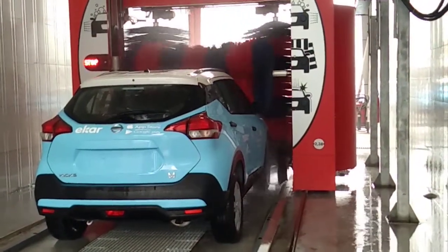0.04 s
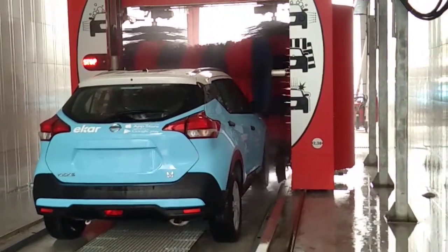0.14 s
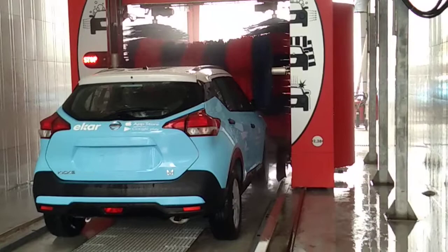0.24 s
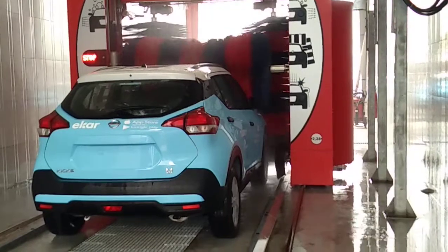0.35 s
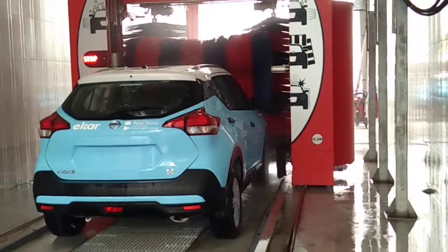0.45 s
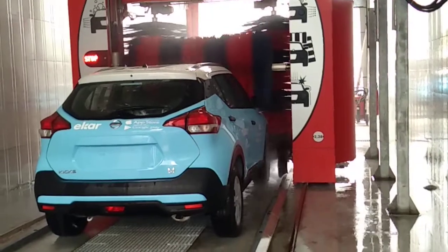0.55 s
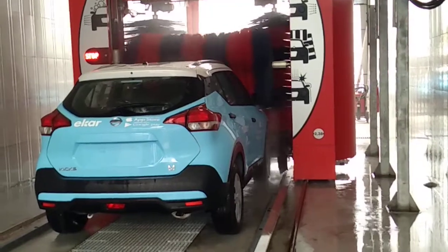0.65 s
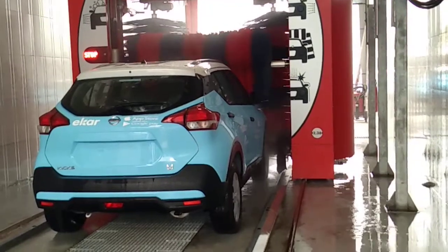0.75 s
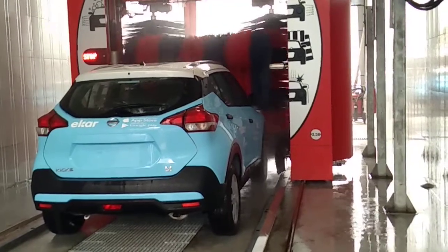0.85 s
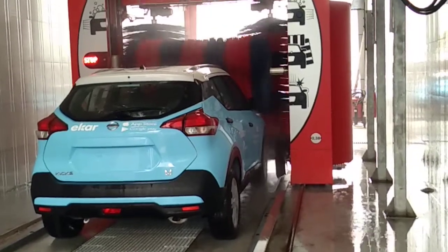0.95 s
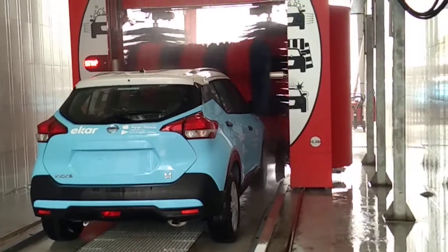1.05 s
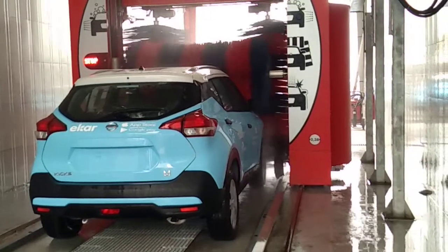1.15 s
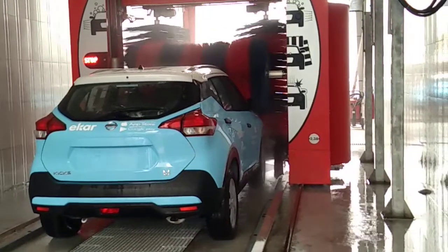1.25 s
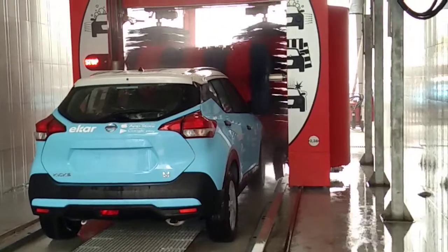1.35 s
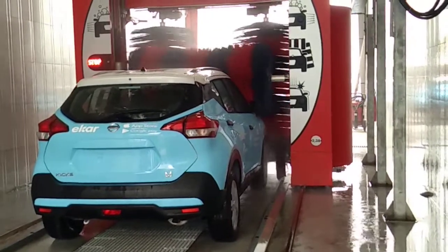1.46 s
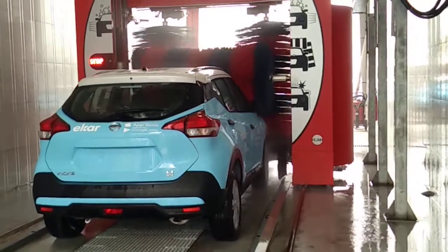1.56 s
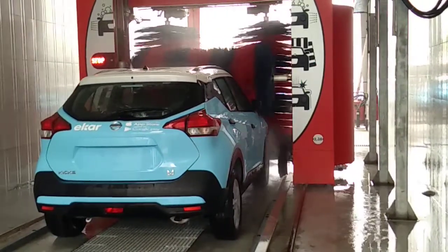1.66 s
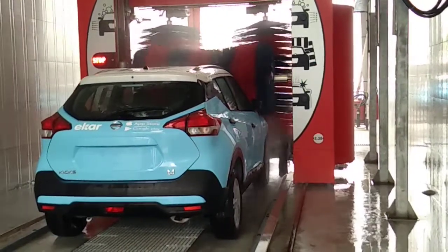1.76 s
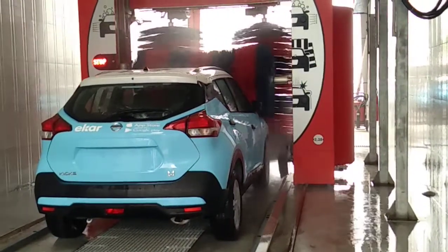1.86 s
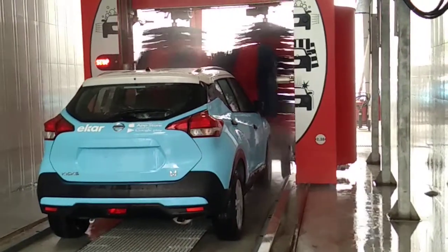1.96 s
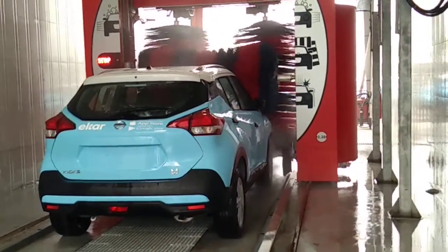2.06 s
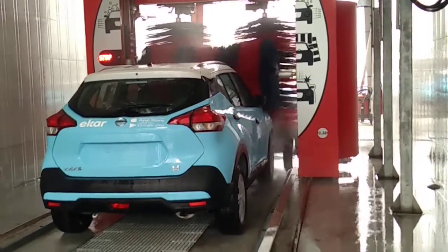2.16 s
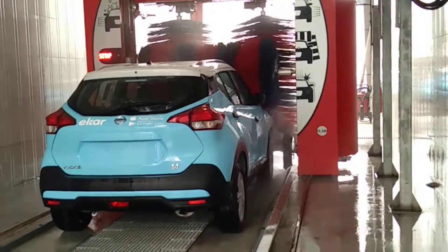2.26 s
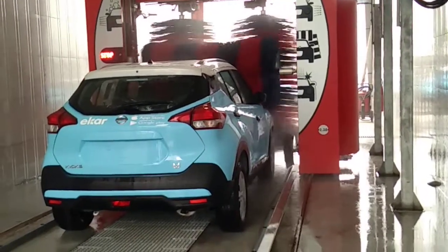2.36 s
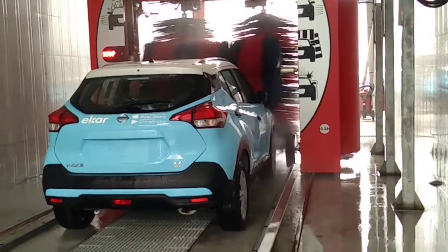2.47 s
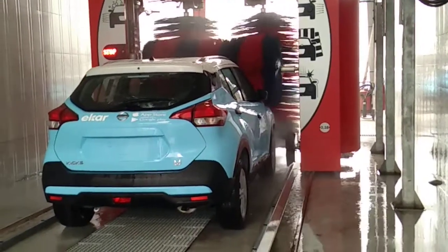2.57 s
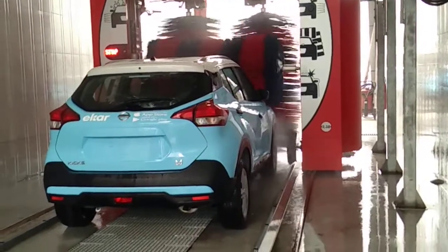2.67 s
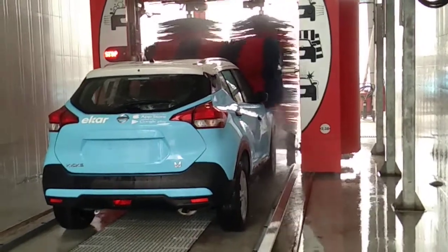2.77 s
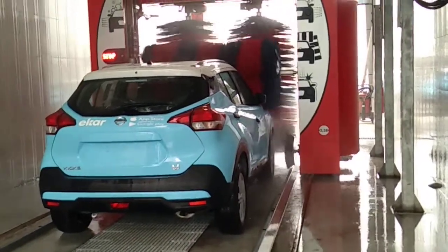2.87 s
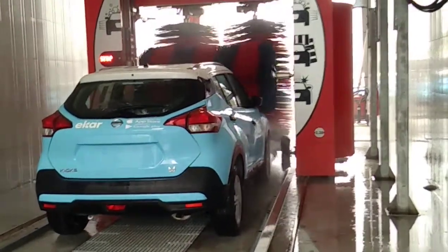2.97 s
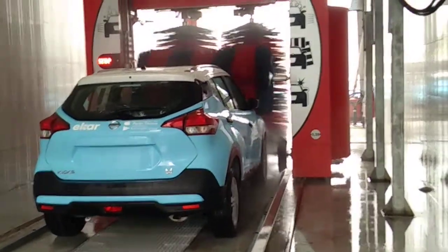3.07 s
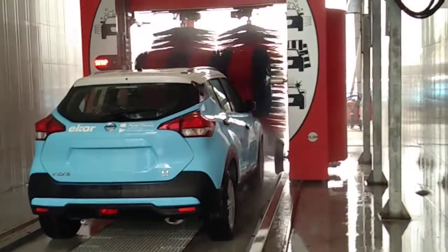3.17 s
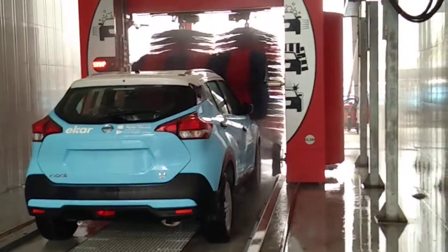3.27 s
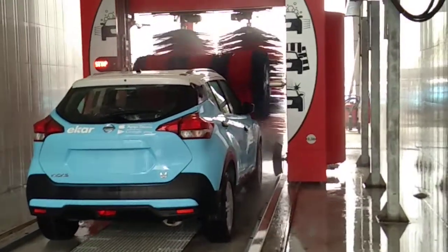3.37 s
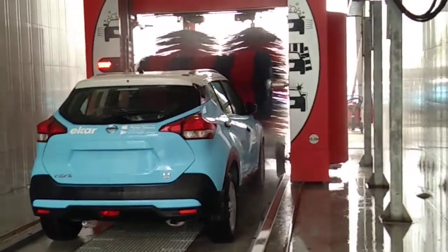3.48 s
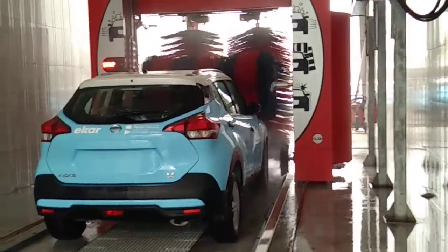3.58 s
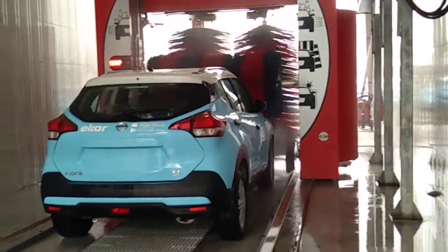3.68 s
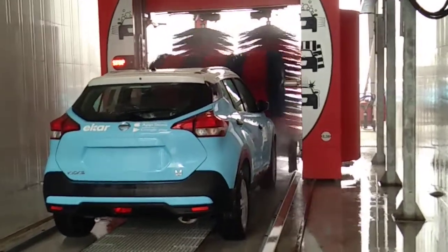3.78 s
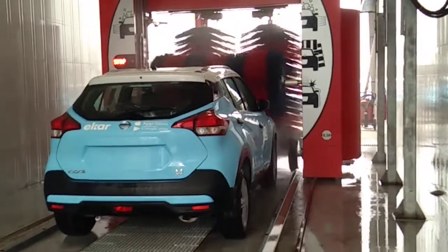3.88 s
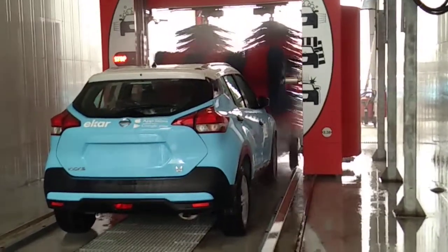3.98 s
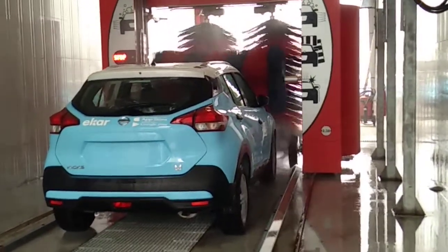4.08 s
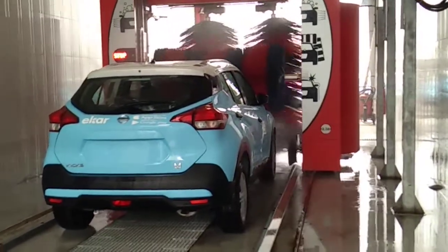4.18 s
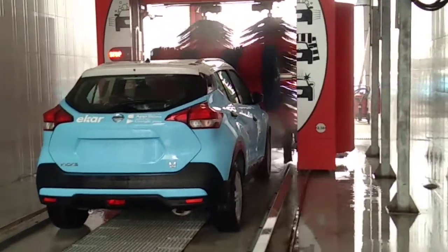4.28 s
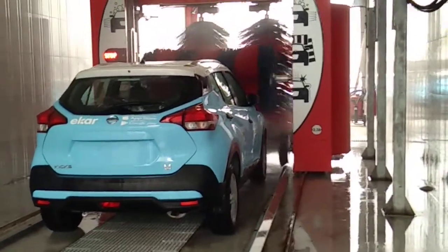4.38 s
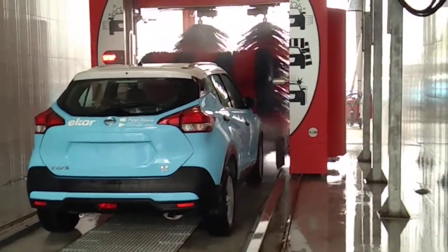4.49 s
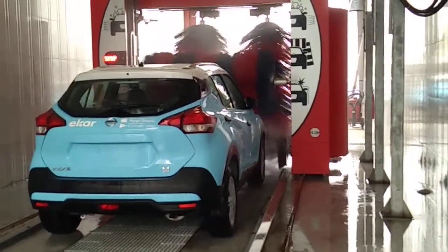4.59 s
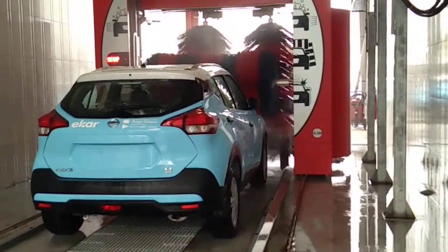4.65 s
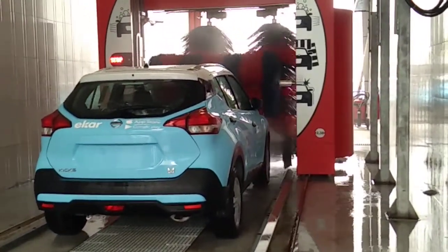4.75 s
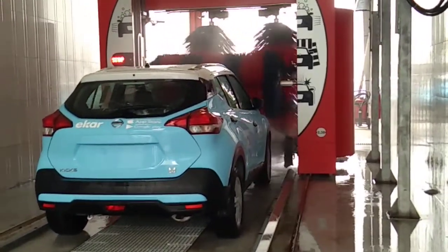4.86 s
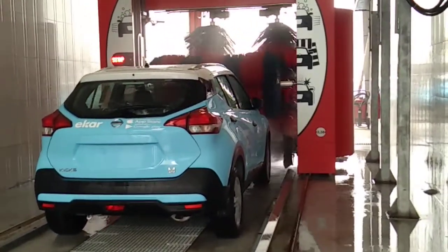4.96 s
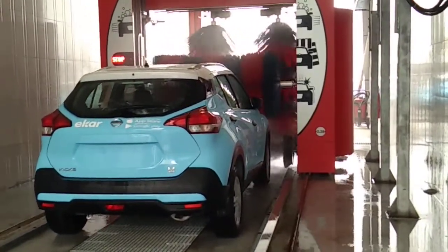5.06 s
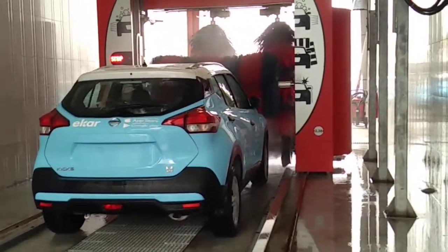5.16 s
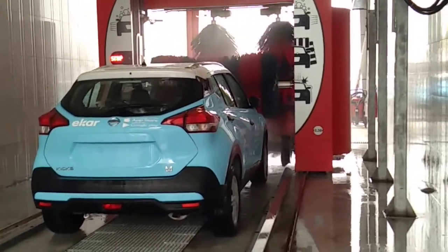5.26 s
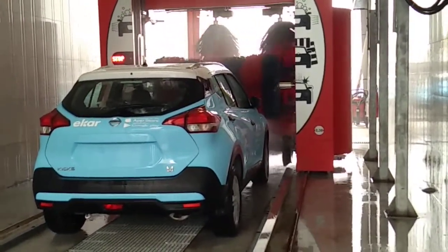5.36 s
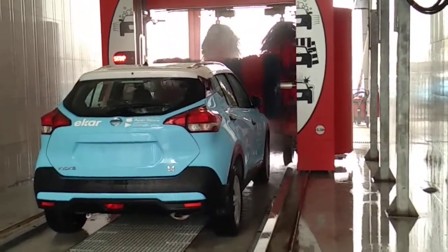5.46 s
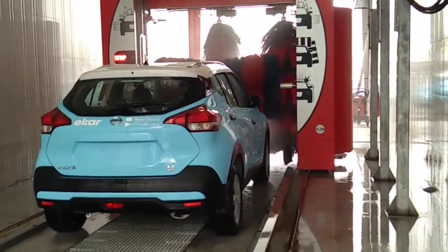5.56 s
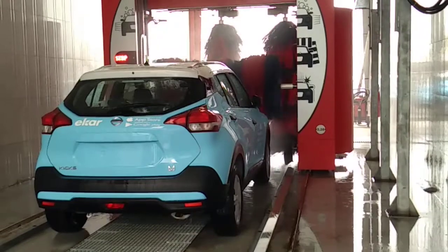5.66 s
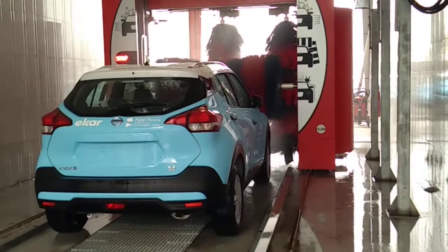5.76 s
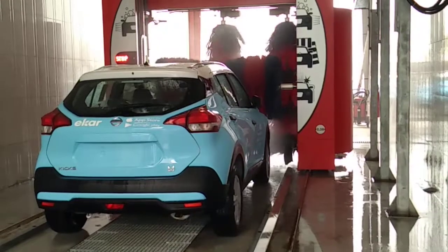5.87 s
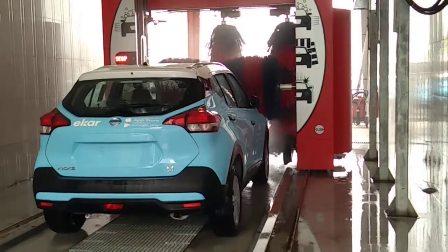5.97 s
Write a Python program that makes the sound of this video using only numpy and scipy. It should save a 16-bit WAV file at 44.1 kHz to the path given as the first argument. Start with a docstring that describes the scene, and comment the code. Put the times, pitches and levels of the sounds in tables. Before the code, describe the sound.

In a hard-walled car wash bay, dense water spray and a hollow rush of wet brush strips run together from the start. Low rumble swells come and go, with two soft body thuds about a second in. The wash slowly weakens, then drops quickly near the end, leaving faint thin wavering tones and hiss. The microphone's noise reduction makes the fading rush patchy, with muffled treble.

```python
"""Water jets of a gantry car wash spray in a tiled bay and fade as the wash winds down: shaped noise.
Wet brush strips scrub the body, a hollow noise rush in lumps; low rumble swells are filtered noise.
Thuds and short soft tones are decaying sines; late thin tones are wavering sines in noise halos.
The recorder's noise suppressor ducks bands near or below a threshold, so hollows open in the rush.
A fine treble haze and steady microphone hiss lie under it all, and the very top is cut off."""
import sys
import numpy as np
from scipy import signal
from scipy.fft import rfft, irfft, next_fast_len
from scipy.io import wavfile

SR = 44100
rng = np.random.default_rng(int(sys.argv[2]) if len(sys.argv) > 2 else 0)


def pcm_store(signal):
    """Save signal as 16-bit PCM."""
    levels = np.round(np.clip(np.atleast_2d(signal), -1, 1) * 32767)
    wavfile.write(sys.argv[1], SR, levels.astype(np.int16).T)


N = 265746   # length in samples, about 6 s


def from_db(db):
    """Turn decibels into a gain."""
    return 10 ** (np.asarray(db) / 20)


def rms_one(x):
    """Scale a sound to an average strength (rms) of 1."""
    return x / np.sqrt(np.mean(x ** 2) + 1e-20)


def in_time(rows):
    """Join the points of a time table by straight lines, one curve per column."""
    time_s, *columns = np.transpose(rows)
    return [np.interp(np.arange(N) / SR, time_s, column) for column in columns]


def at_hz(points, hz):
    """Read a spectrum table at any pitch, along a logarithmic pitch axis."""
    point_hz, point_db = np.transpose(points)
    return np.interp(np.log(hz + 1), np.log(point_hz), point_db)


def drift(rate):
    """Slow random wander with rms 1: noise smoothed twice; a higher rate wanders faster."""
    step = 40   # samples between the computed points
    memory = np.exp(-2 * np.pi * step * rate / SR)
    noise = rng.standard_normal(N // step + 2002)
    slow = signal.lfilter([1], [1, -2 * memory, memory ** 2], noise)[2000:]   # drop the settling
    return np.interp(np.arange(N) / step, np.arange(len(slow)), rms_one(slow))


def coloured(spectrum, closed=True):
    """Noise shaped to a spectrum, rms 1; closed ends fall away beyond the table."""
    size = next_fast_len(N)
    hz = np.fft.rfftfreq(size, 1 / SR)
    if closed:
        spectrum = [(10, -90)] + spectrum + [(4 * spectrum[-1][0], -110)]
    white = rfft(rng.standard_normal(size))
    return rms_one(irfft(white * from_db(at_hz(spectrum, hz)), size)[:N])


def low_parts(x, edges_hz, order):
    """Copies of a sound, each keeping what lies below one edge, without delay."""
    return [signal.sosfiltfilt(signal.butter(order, hz, fs=SR, output="sos"), x) for hz in edges_hz]


def resonance(x, hz, width_hz):
    """Something that rings at one pitch: a band-pass filter with gain 1 at its peak."""
    r = np.exp(-np.pi * width_hz / SR)
    feedback = [1, -2 * r * np.cos(2 * np.pi * hz / SR), r * r]
    return signal.lfilter([(1 - r * r) / 2, 0, (r * r - 1) / 2], feedback, x)


def narrow(modes, flicker_db, rate):
    """Noise sent twice through each resonance, wavering in level."""
    total = 0
    for hz, width_hz, level_db in modes:
        once = resonance(rng.standard_normal(N), hz, width_hz)
        tone = rms_one(resonance(once, hz, width_hz))
        total = total + from_db(level_db + flicker_db * drift(rate)) * tone
    return total


# Water flow through the nozzles, as spray level: time_s, level_db
WATER_FLOW = [(0, -18.5), (.1, -18.5), (.48, -19), (.62, -17.5), (1.0, -19.5), (1.4, -20), (2.25, -21),
              (2.5, -22), (3.4, -22.5), (4.2, -23), (5.1, -23.5), (5.3, -25.5), (5.4, -28), (5.5, -29.5),
              (5.6, -30), (5.64, -33), (5.7, -35), (5.76, -37.5), (6.03, -38.5)]


def water_flow():
    """The flow sets the spray level and also steers the brushes and the haze."""
    return in_time(WATER_FLOW)[0]


# Tone colour of the jets: pitch_hz, relative level_db (per Hz)
SPRAY_SPECTRUM = [(900, -18), (1200, -5.5), (1460, -2.5), (2400, -0.5), (3100, -4), (4080, -0.5),
                  (4280, -0.5), (4480, -14.5), (4580, -20), (5400, -37)]
# How much faster or slower each band fades, low to high: loss_db per dB of missing flow
BAND_LOSSES = (.3, 0.16, .2, 0.025, -0.079, 0.13, .1, .3)
# Narrow high noise bands: pitch_hz, width_hz, level_db (rms, before level change and flicker)
HIGH_BANDS = [(4625, 100, -51), (4850, 60, -62), (5067, 120, -56), (5521, 80, -58)]
# Level of the high bands over time: time_s, change_db
HIGH_BAND_CHANGE = [(0, 4), (.4, 5), (.75, 4), (1.25, -1), (1.45, -1.5), (1.7, 1), (2.0, -3), (2.45, -7),
                    (2.65, -6), (2.85, -11), (3.4, -24), (6.03, -20)]
# Below this flow the jets flicker, by this share of the missing dB
SPUTTER_BELOW_DB, SPUTTER_SHARE = -27, 0.22


def spray(level_db):
    """Dense jets on metal blur into smooth noise; its bands surge separately, narrow high ones flicker."""
    jets = coloured(SPRAY_SPECTRUM)
    lows = low_parts(jets, (1290, 1680, 2020, 2300, 3080, 3470, 4000), order=4)
    bands = np.diff([0 * jets] + lows + [jets], axis=0)
    missing_db = np.maximum(SPUTTER_BELOW_DB - level_db, 0)
    sputter_db = SPUTTER_SHARE * missing_db
    surging = 0
    for band, loss in zip(bands, BAND_LOSSES):
        band_db = 0.13 * drift(7.5) + sputter_db * drift(12.0) - loss * missing_db
        surging = surging + band * from_db(band_db)
    surging = surging * from_db(0.061 * drift(3.0))   # all bands together
    high_bands = narrow(HIGH_BANDS, flicker_db=3.5, rate=7.3)
    return from_db(level_db) * surging + from_db(in_time(HIGH_BAND_CHANGE)[0]) * high_bands


# Level at 0 dB flow, share of the flow's swing, and loss as the brushes slow
SCRUB_DB, SCRUB_FOLLOWS, BRUSH_SAG_DB_PER_S = -6.5, 0.66, 1.5
BRUSH_LIFT_S, BRUSH_LIFT_DB = 5.38, -3   # the brushes leave the body within a tenth of a second


def brush_level(flow_db):
    """Brushes follow the water in part, lose level as they slow, then lift off the body."""
    t = np.arange(N) / SR
    lift_db = BRUSH_LIFT_DB * np.clip(10 * (t - BRUSH_LIFT_S), 0, 1)
    return SCRUB_DB + SCRUB_FOLLOWS * flow_db - BRUSH_SAG_DB_PER_S * t + lift_db


# Tone colour of the brush rush: pitch_hz, relative level_db (per Hz)
SCRUB_SPECTRUM = [(250, -61), (330, -6.5), (480, -6), (620, -4), (740, -2), (950, -5), (1100, -8),
                  (1400, -11.5)]
# Lower scrub against the rest: time_s, change_db below about 493 Hz, change_db at about 493-663 Hz
LOW_SCRUB = [(0, -3, 1), (.1, -3.5, -8.5), (.25, -4, 2), (.6, -1.5, -2.5), (1.1, 2, 2), (1.33, -3, 0.5),
             (1.5, 6, 2), (1.75, -6, 0), (1.95, 4.5, 1), (2.13, -12, 5.5), (2.25, 8.5, -0.5),
             (2.42, -1.5, 2.5), (2.5, -4, -7.5), (2.58, 1.5, 0), (2.68, -7, 1.5), (2.8, 5, -6),
             (2.88, 1, 1), (2.96, -4, 2), (3.08, 4.5, 1), (3.14, 0.5, -5), (3.2, -0.5, 0), (3.27, -3, -0.5),
             (3.38, 2.5, 2), (3.5, 0.5, -2.5), (3.56, 0, -9), (3.64, 3, -1), (3.75, -11, -12),
             (4.0, -3, -4), (4.3, 1, -6), (4.45, -11, -11), (5.12, -12, -8), (5.2, -13, 6), (5.27, -2, 0),
             (5.5, 2, -2), (6.03, 1, 1)]
LUMP_DB, LUMPS_PER_S = 2.6, 18   # random lumps: rms size, wander rate


def scrub(level_db):
    """Thousands of wet strips slap the panels and blur to a hollow rush with lumpy lower bands."""
    rush = coloured(SCRUB_SPECTRUM)
    lows = low_parts(rush, (363, 493, 543, 663), order=8)
    bands = np.diff([0 * rush] + lows, axis=0)
    low_db, high_db = in_time(LOW_SCRUB)
    lumpy = 0
    for band, band_db in zip(bands, (low_db, low_db, high_db, high_db)):
        lumpy = lumpy + band * from_db(band_db + LUMP_DB * drift(LUMPS_PER_S))
    upper = rush - lows[-1]
    return from_db(level_db + 0.54 * drift(11.0)) * (upper + lumpy)


# Tone colour of the low rumble: pitch_hz, relative level_db (per Hz)
RUMBLE_SPECTRUM = [(30, -35), (48, -28), (72, -9.5), (120, -8.5), (190, -9), (240, 1.5), (300, -2),
                   (340, -4), (450, -3)]
# Panel resonances in the rumble: pitch_hz, width_hz, level_db (against the rumble noise)
PANEL_RESONANCES = [(128.2, 16, -17.5), (160.2, 61, -12), (193.7, 10, -11.5), (237.8, 25, -9.5)]
# Swells: full_from_s, hold_s, level_db, brightness_db (added to the upper half, taken from the deep)
RUMBLE_SWELLS = [(0, 0.039, -34.5, 2), (0.117, 0.4, -46.5, 14.5), (0.664, .03, -36.5, 2.5),
                 (0.74, 0.11, -29, -1), (0.983, 0.17, -24, -5), (1.27, 0.34, -35, 0.5),
                 (1.688, 0.13, -30.5, -3.5), (1.82, 0.22, -24.5, -3.5), (2.16, 0.5, -28, -1.5),
                 (2.754, 0.5, -31.5, -4.5), (3.42, 0.27, -34.5, -1.5), (3.747, 0.17, -39.5, 2.5),
                 (3.945, 0.21, -36.5, -3.5), (4.272, 0.058, -31, -2), (4.423, 0.061, -39.5, -3),
                 (4.536, 0.099, -41.5, 3.5), (4.737, 0.13, -34.5, -2), (4.91, 0.068, -42.5, -7),
                 (5.025, 0.21, -36.5, -0.5), (5.3, 0.11, -48, -2.5), (5.472, 0.12, -42.5, -10),
                 (5.74, 0.12, -49, -8), (5.917, .11, -42, -6.5)]
SWELL_RISE_S, SWELL_FALL_S, LULL_DB = 0.062, 0.078, -47.5   # the lull level always lies underneath


def rumble():
    """Lumpy low noise rises fast, holds and dies away; bright swells trade deep sound for upper."""
    t = np.arange(N) / SR
    deep_gain = upper_gain = from_db(LULL_DB)
    for full_s, hold_s, level_db, bright_db in RUMBLE_SWELLS:
        rise = np.clip((t - full_s) / SWELL_RISE_S + 1, 0, 1)
        fall = np.exp(-np.maximum(t - full_s - hold_s, 0) / SWELL_FALL_S)
        deep_gain = deep_gain + from_db(level_db - bright_db) * rise * fall
        upper_gain = upper_gain + from_db(level_db + bright_db) * rise * fall
    noise = coloured(RUMBLE_SPECTRUM) + narrow(PANEL_RESONANCES, flicker_db=2.0, rate=5.3)
    deep = signal.sosfilt(signal.butter(5, 165, fs=SR, output="sos"), noise)
    upper = signal.sosfilt(signal.butter(5, 165, "high", fs=SR, output="sos"), noise)
    deep = deep * deep_gain * from_db(1.0 * drift(7.5))
    upper = upper * upper_gain * from_db(0.6 * drift(23.0))
    return deep + upper


def rings(events):
    """Brief ringing tones: each is a sine that starts softly and decays."""
    out = np.zeros(N)
    t = np.arange(round(.15 * SR)) / SR
    for start_s, strength_db, pitch_hz, decay_s in events:
        at = round(start_s * SR)
        soft_start = 1 - np.exp(-t / 0.0052)
        ring = np.sin(2 * np.pi * pitch_hz * t) * soft_start * np.exp(-t / decay_s)
        out[at:at + len(t)] += (from_db(strength_db) * ring)[:N - at]
    return out


# Thuds on the body: start_s, strength_db (before the ring's rise and decay), pitch_hz, decay_s
BODY_THUDS = [(1.085, -3, 169, 0.0076), (1.177, -3.5, 197, 0.0065), (1.89, -11, 185, 0.013),
              (4.245, -19, 260, 0.021), (4.284, -20, 191.6, 0.018), (5.9, -25, 129, 0.014),
              (5.972, -24.5, 111, 0.013)]


def thuds():
    """Soft blows on the car body ring its panels for a few low cycles."""
    return rings(BODY_THUDS)


# Short soft tones in the lower rush: start_s, strength_db (before the rise and decay), pitch_hz
SHORT_TONES = [(3.71, -35, 500), (3.93, -35, 550), (4.0, -38, 550), (4.09, -36, 422), (4.145, -31, 520),
               (4.176, -35, 418), (4.52, -35, 420), (4.63, -31, 466), (4.94, -35, 400), (4.98, -35, 557),
               (5.185, -35, 535)]
SHORT_TONE_DECAY_S = 0.016


def short_tones():
    """Short soft tones at 400 to 560 Hz in the lower rush: quickly decaying sines."""
    return rings([(*row, SHORT_TONE_DECAY_S) for row in SHORT_TONES])


# Short spells of thin tone: start_s, length_s, pitch_hz, waver_hz (rms), level_db (rms, before flutter)
THIN_TONES = [(5.3, .56, 980, 25, -50), (5.875, .04, 1000, 25, -50), (5.92, .08, 975, 25, -51),
              (5.44, .17, 1790, 30, -48), (5.69, .12, 1800, 30, -44.5), (5.815, .04, 1840, 25, -47),
              (5.865, .065, 1830, 35, -48), (5.925, .07, 1760, 35, -46), (5.66, .19, 2370, 40, -48),
              (5.86, .07, 2400, 55, -47), (5.935, .09, 2400, 50, -51), (5.655, .07, 1570, 25, -48),
              (5.73, .17, 2640, 50, -53), (5.73, .05, 3370, 30, -48), (5.8, .11, 3420, 30, -48.5),
              (5.915, .045, 3430, 40, -50), (5.69, .07, 3740, 40, -52)]
FLUTTER_DB, FLUTTERS_PER_S, WAVERS_PER_S = 2.0, 35, 35   # level flutter, and wander rates
TONE_EDGE_S, HALO_WIDTH_HZ, HALO_DB = .015, 200, -5   # fade length; halo level is against the sine


def thin_tones():
    """Sines that waver in pitch and level, in narrow noise halos, in short spells late in the fade."""
    out, t = 0, np.arange(N) / SR
    for start_s, length_s, pitch_hz, waver_hz, level_db in THIN_TONES:
        inside_s = np.minimum(t - start_s, start_s + length_s - t)
        spell = np.clip(inside_s / TONE_EDGE_S + .5, 0, 1)
        pitch = pitch_hz + waver_hz * drift(WAVERS_PER_S)
        sine = np.sqrt(2) * np.sin(2 * np.pi * np.cumsum(pitch) / SR)
        line = from_db(FLUTTER_DB * drift(FLUTTERS_PER_S)) * sine
        halo = narrow([(pitch_hz, HALO_WIDTH_HZ, HALO_DB)], flicker_db=-5.5, rate=FLUTTERS_PER_S)
        out = out + spell * from_db(level_db) * (line + halo)
    return out


# Tone colour of the haze: pitch_hz, relative level_db (per Hz)
MIST_SPECTRUM = [(30, -2), (120, 17), (300, 13), (4000, 4), (4600, 9.5), (5200, 9.5), (5800, 2.5),
                 (6800, -2.5), (8000, 0.5), (10200, 4), (11800, -3), (15500, -3)]
MIST_DB, MIST_FOLLOWS = -26, 1.134   # level at 0 dB flow, share of the flow's swing


def mist():
    """A fine treble haze: noise that follows the water flow."""
    level_db = MIST_DB + MIST_FOLLOWS * water_flow() + 0.34 * drift(10.0)
    return from_db(level_db) * coloured(MIST_SPECTRUM, closed=False)


# Tone colour of the microphone hiss: pitch_hz, relative level_db (per Hz)
HISS_SPECTRUM = [(30, -14), (100, 4), (300, 12), (600, 4), (1500, -9), (4000, 9), (6000, 1), (11000, -1),
                 (15500, -11)]
HISS_DB = -65.5


def hiss():
    """Steady microphone noise."""
    return from_db(HISS_DB) * coloured(HISS_SPECTRUM, closed=False)


def scene():
    """All sources that meet the suppressor, added at one microphone."""
    flow_db = water_flow()
    wash = spray(flow_db) + scrub(brush_level(flow_db))
    return (wash + rumble() + thuds() + short_tones() + thin_tones())[None]


# Suppressor threshold: pitch_hz, level_db (per Hz)
DUCK_THRESHOLD = [(60, -69), (200, -62.5), (280, -59.5), (350, -55.5), (650, -57.5), (700, -59), (800, -63),
                  (1000, -71), (1200, -60.5), (1500, -67.5), (1780, -66), (2050, -65.5), (2300, -68.5),
                  (2800, -71.5), (3150, -72.5), (3400, -70), (3550, -66), (3750, -68), (4000, -66),
                  (4250, -58), (4480, -67), (4580, -75), (5000, -82), (5600, -80)]
DUCK_DB, HOLD_S, SPREAD_HZ = -18, 0.045, 55   # lowest gain, smoothing in time and in pitch


def suppress(x):
    """Split sound into short spectra and turn down bins whose smoothed power nears the threshold."""
    frames = dict(nperseg=1024, noverlap=768, scaling="psd")
    hz, _, spectra = signal.stft(x, SR, **frames)
    power = 2 * np.abs(spectra) ** 2
    keep = np.exp(-256 / SR / HOLD_S)   # 256 samples from frame to frame
    power = signal.lfilter([1 - keep], [1, -keep], power, axis=-1, zi=power[..., :1] * keep)[0]
    share = np.clip(SPREAD_HZ / hz[1] / 4, 0, .5)   # part taken from the neighbouring bins
    neighbours = np.roll(power, 1, axis=-2) + np.roll(power, -1, axis=-2)
    power = (1 - share) * power + share / 2 * neighbours
    threshold_power = from_db(2 * at_hz(DUCK_THRESHOLD, hz))[:, None]
    gain = np.maximum(1 - threshold_power / (power + 1e-20), from_db(DUCK_DB))
    return signal.istft(spectra * gain, SR, **frames)[1][..., :N]


CUTOFF_HZ = 15530


def record(dry):
    """Round the peaks, suppress, add the unducked haze and hiss, then cut the top."""
    rounded = 0.98 * np.tanh(dry / 0.92)
    mixed = suppress(rounded) + mist() + hiss()
    return signal.sosfilt(signal.ellip(14, .3, 70, CUTOFF_HZ, fs=SR, output="sos"), mixed)


dry = scene()
out = record(dry)
pcm_store(out)
```